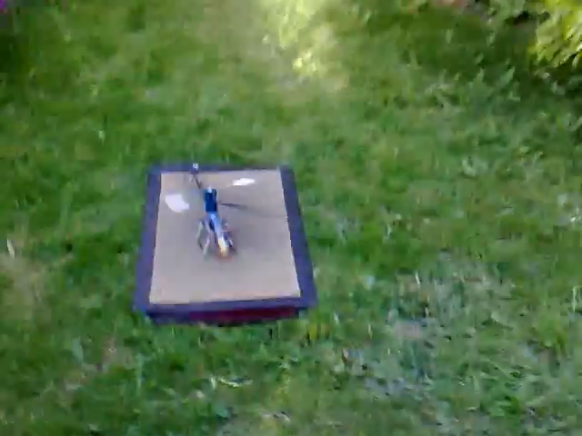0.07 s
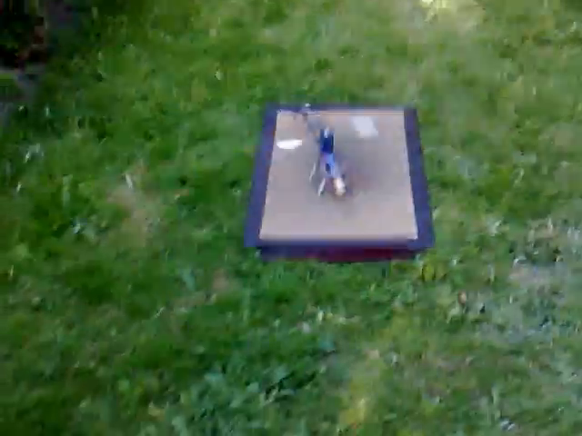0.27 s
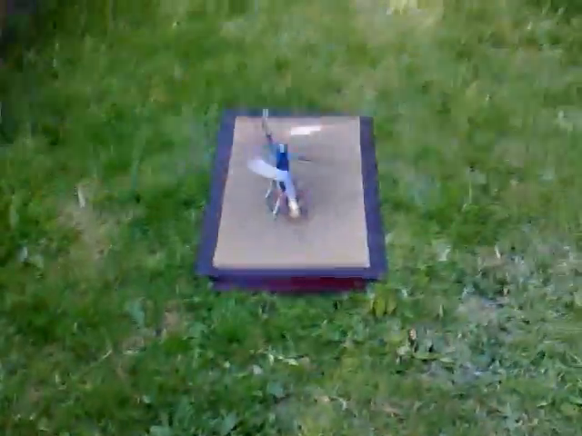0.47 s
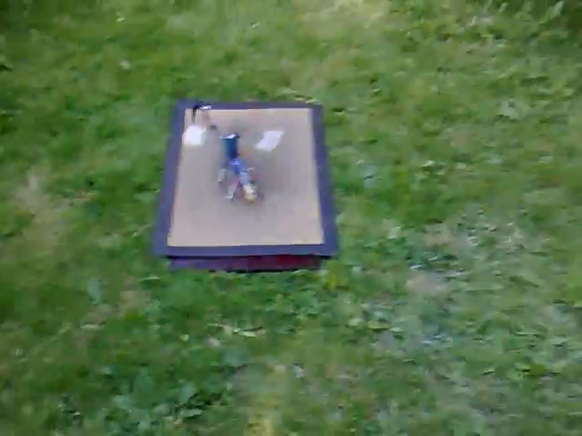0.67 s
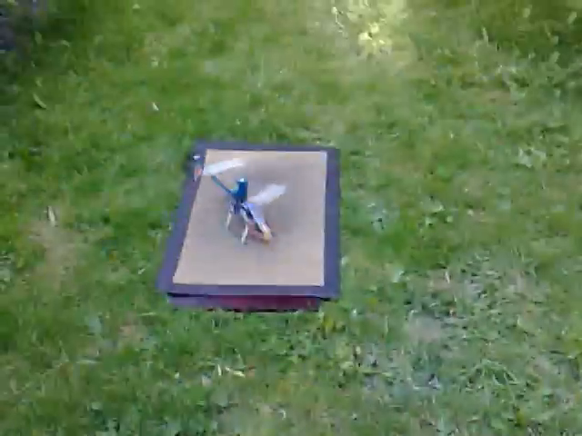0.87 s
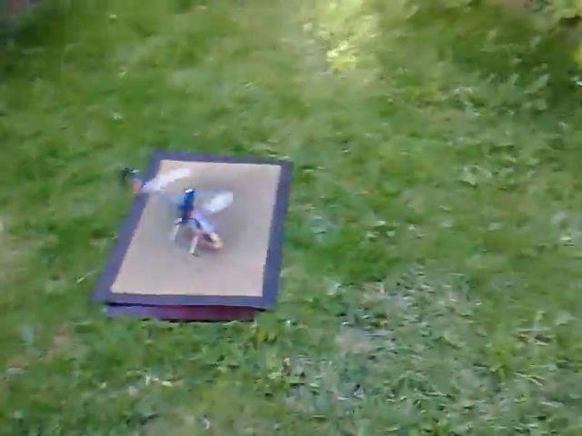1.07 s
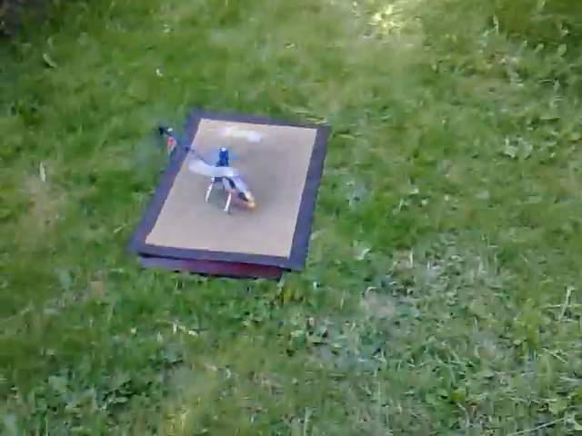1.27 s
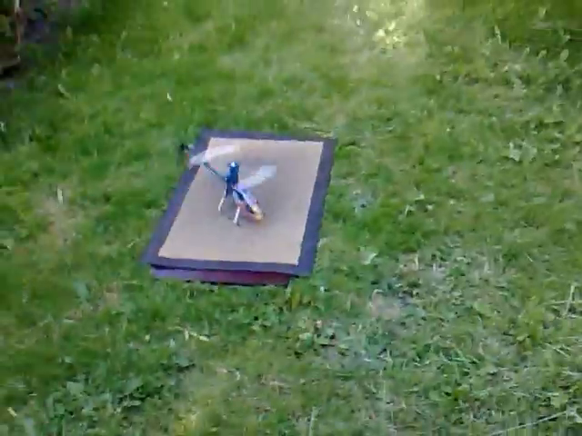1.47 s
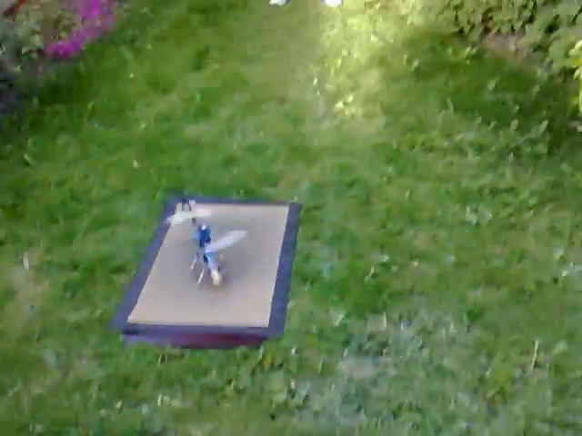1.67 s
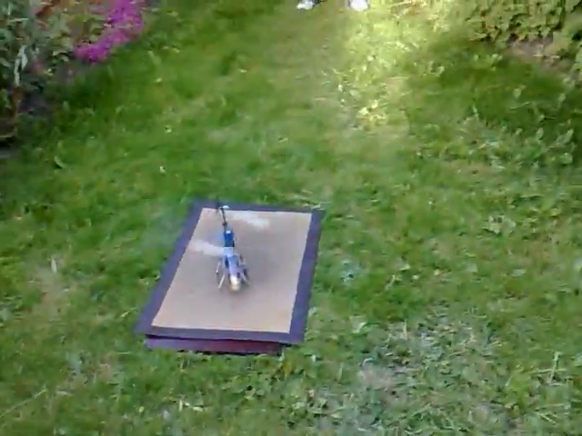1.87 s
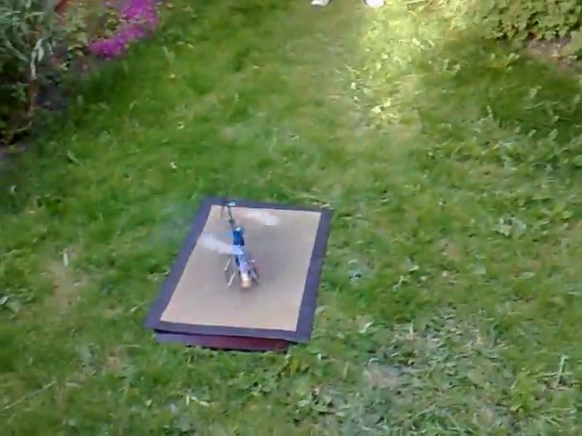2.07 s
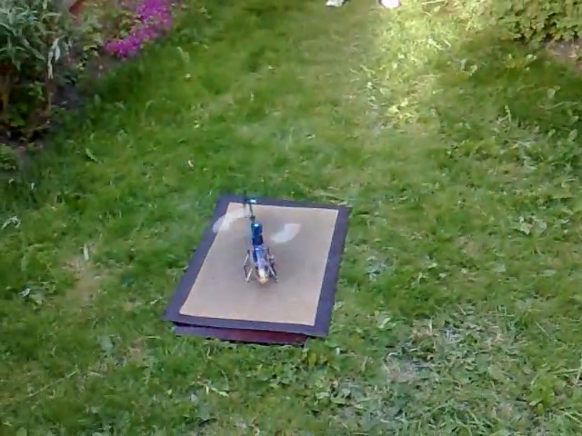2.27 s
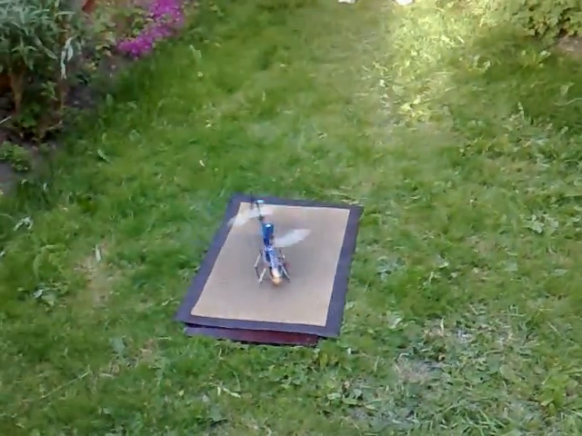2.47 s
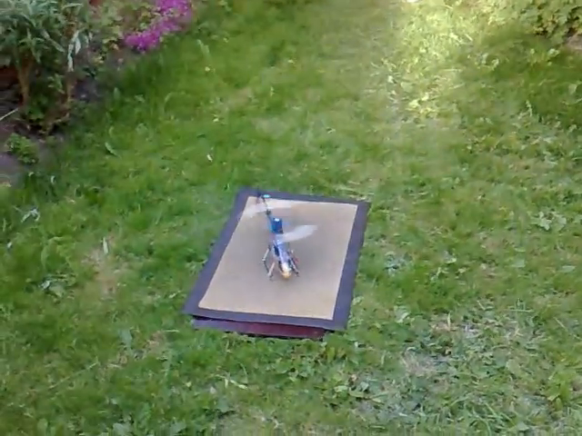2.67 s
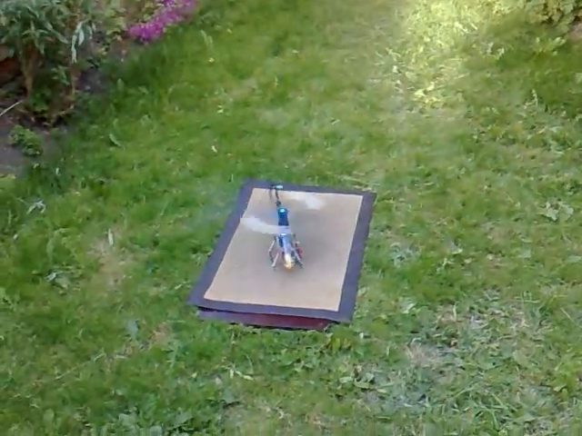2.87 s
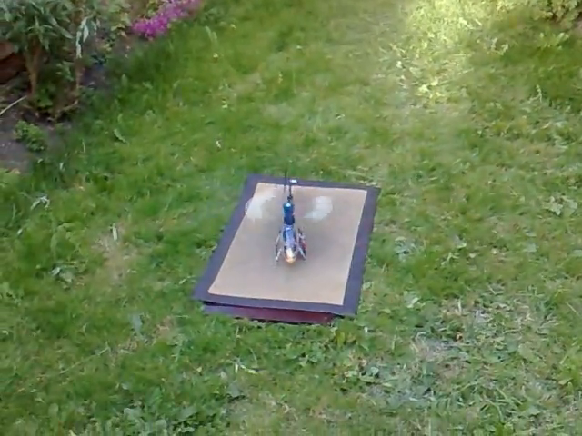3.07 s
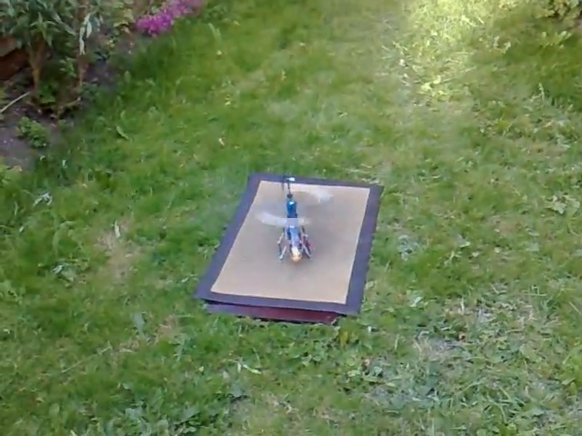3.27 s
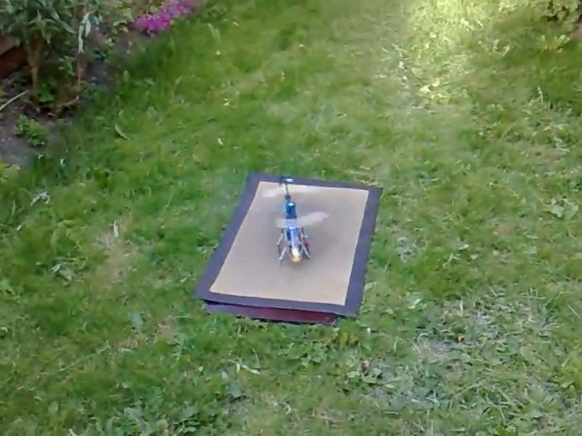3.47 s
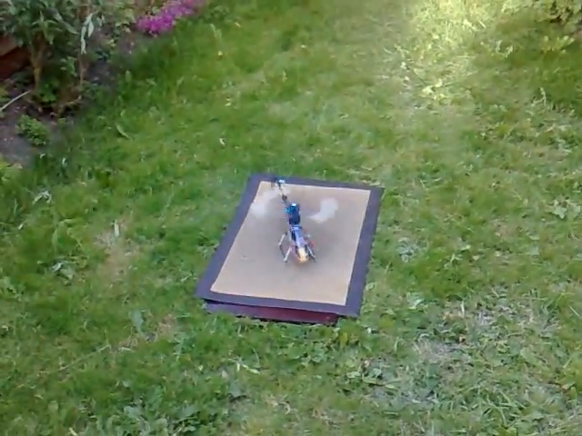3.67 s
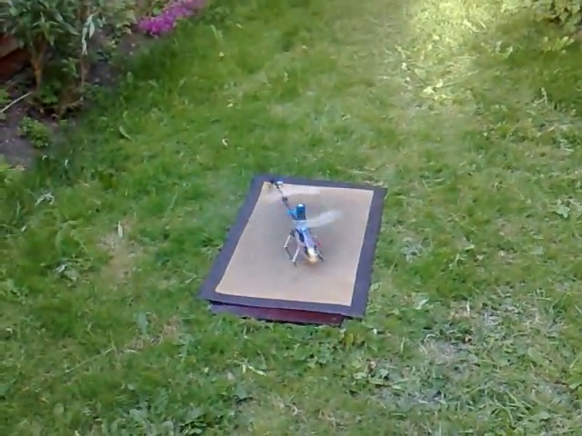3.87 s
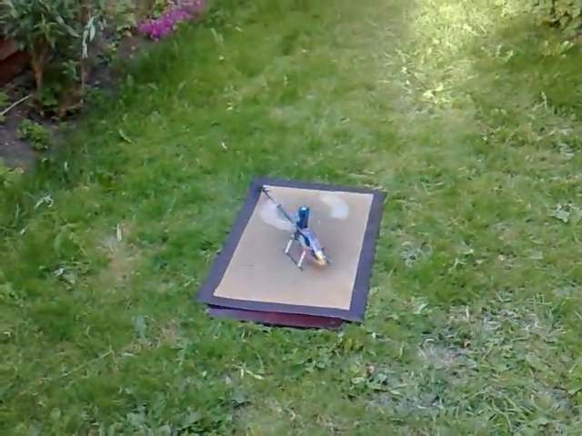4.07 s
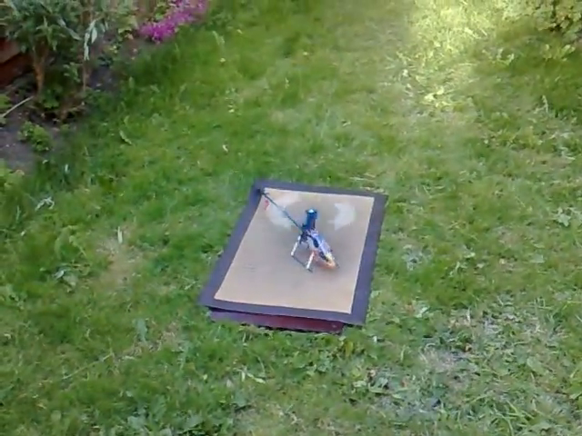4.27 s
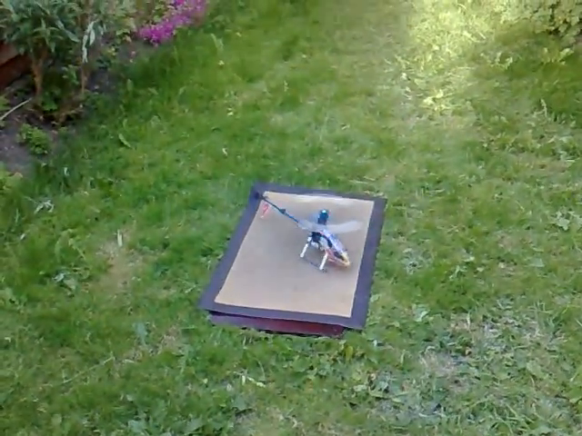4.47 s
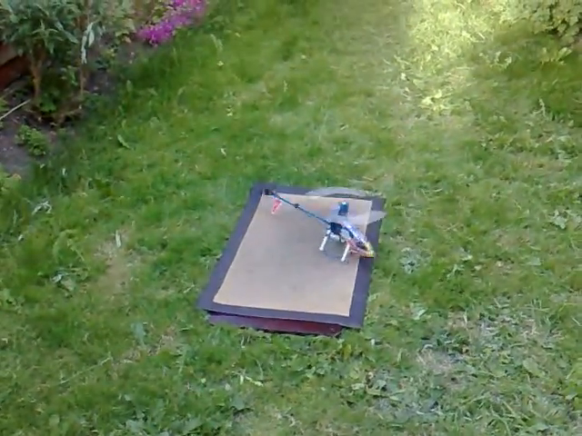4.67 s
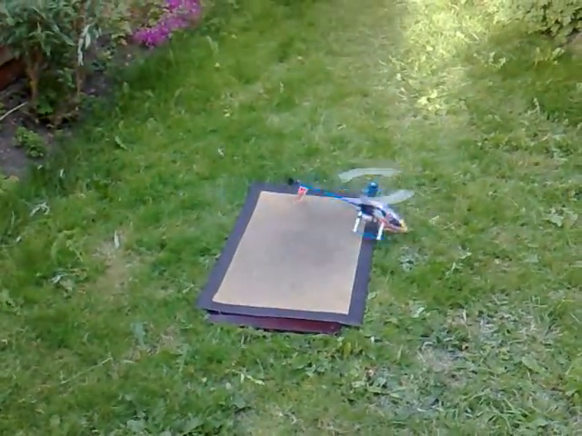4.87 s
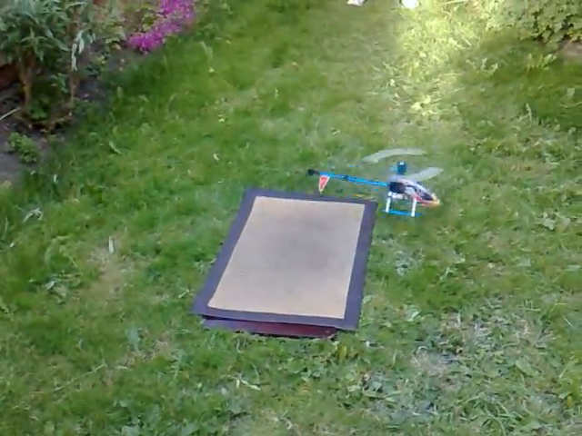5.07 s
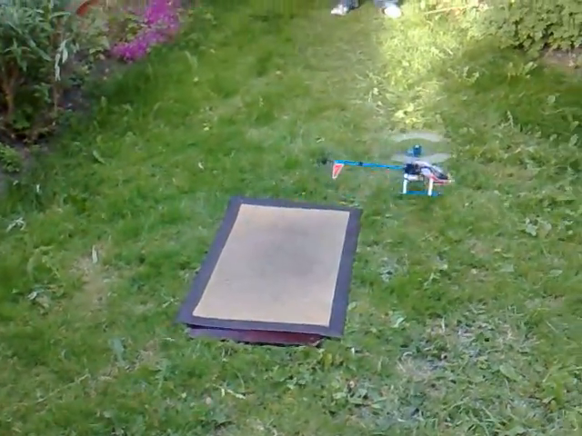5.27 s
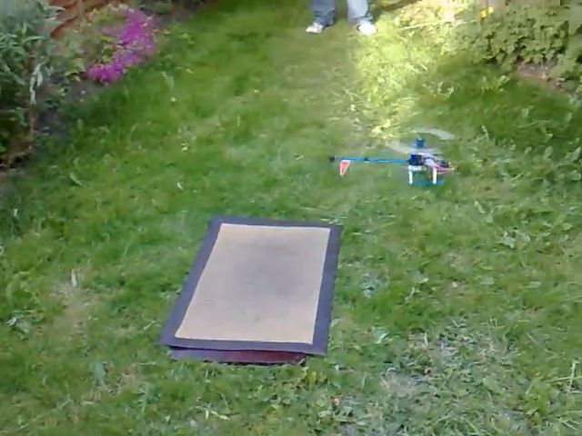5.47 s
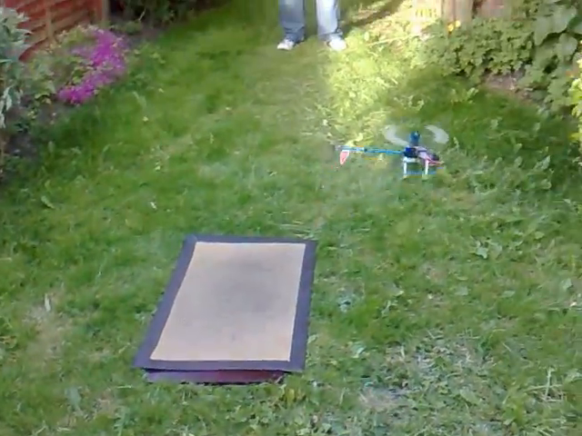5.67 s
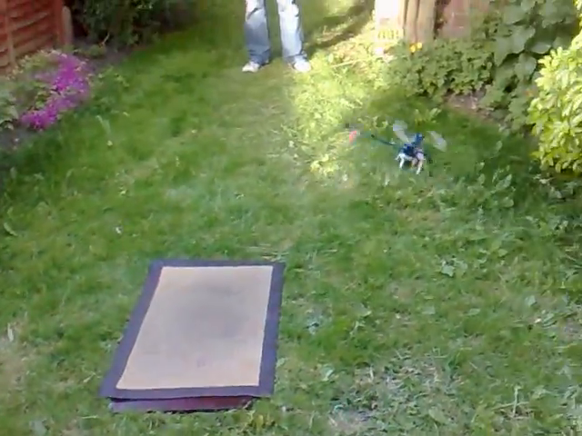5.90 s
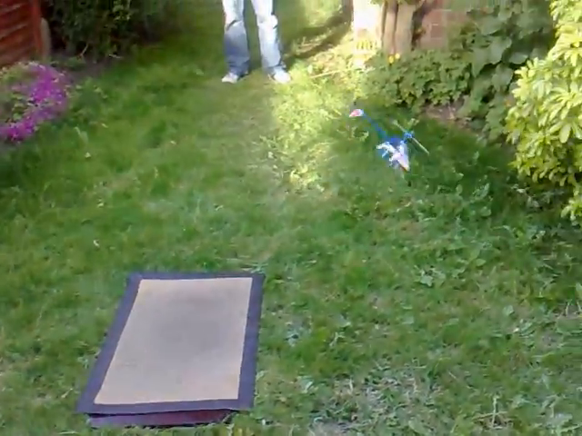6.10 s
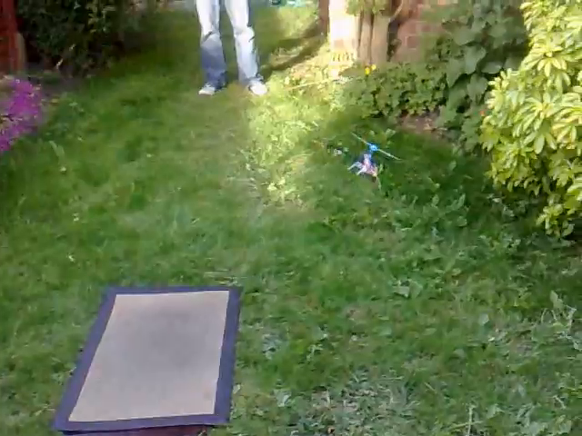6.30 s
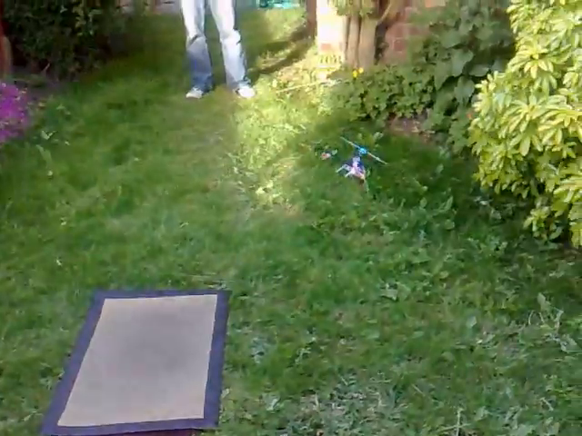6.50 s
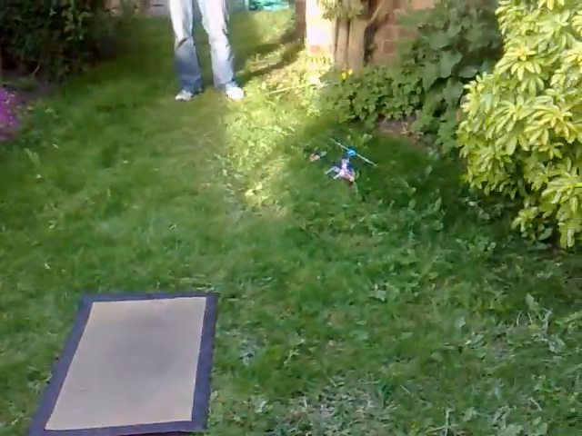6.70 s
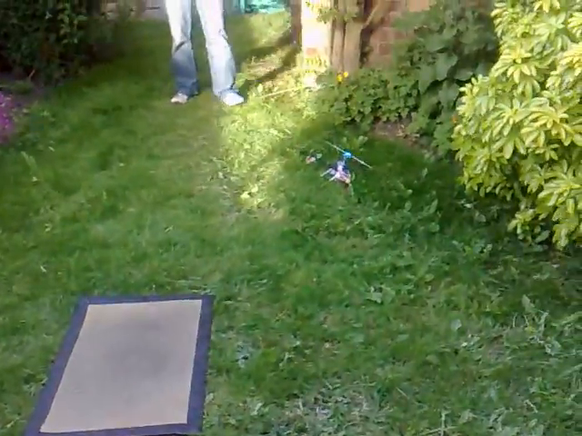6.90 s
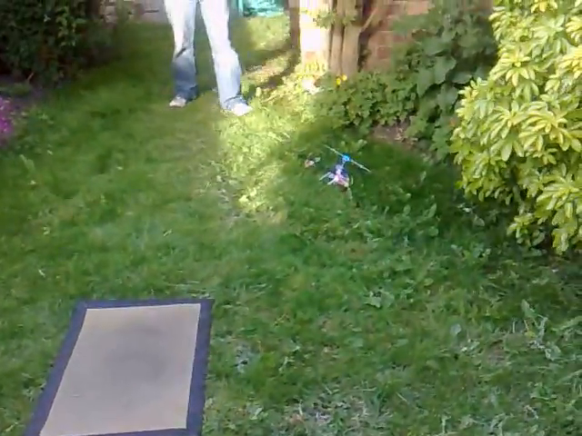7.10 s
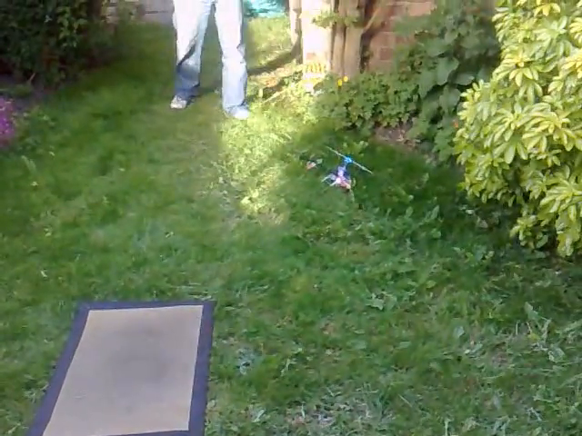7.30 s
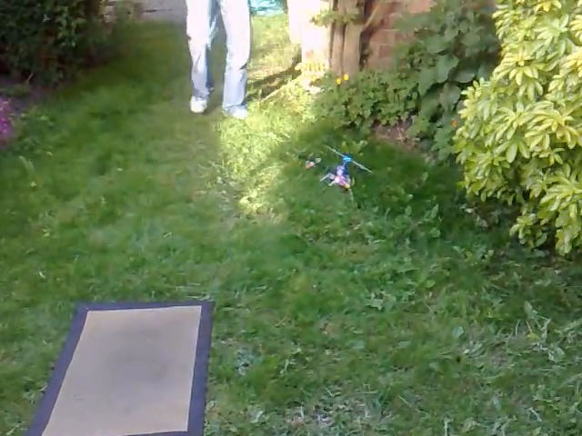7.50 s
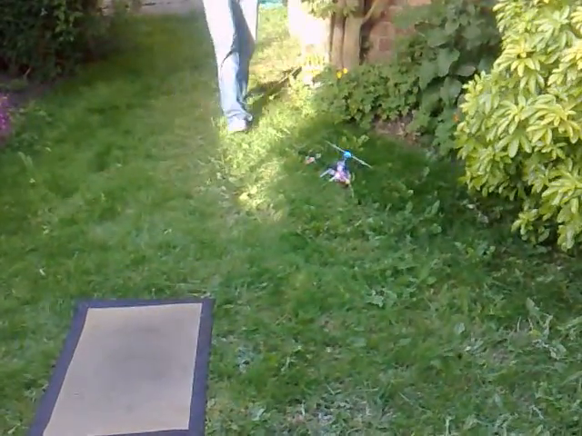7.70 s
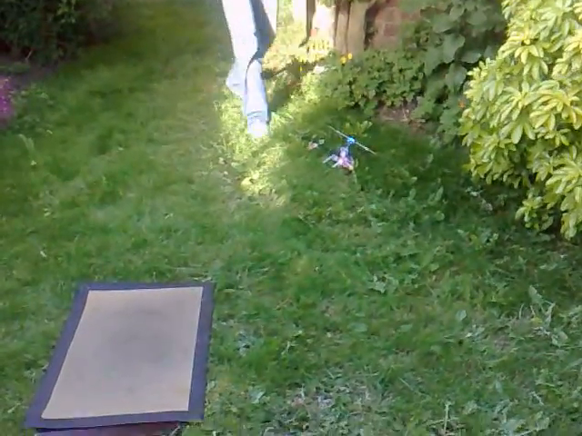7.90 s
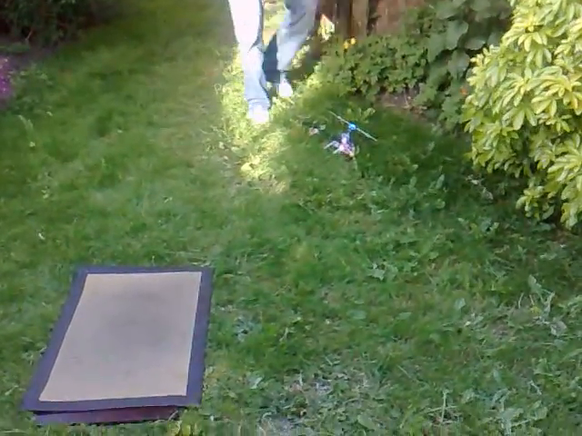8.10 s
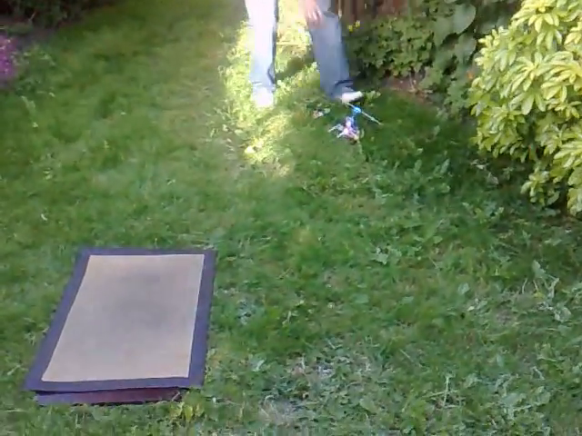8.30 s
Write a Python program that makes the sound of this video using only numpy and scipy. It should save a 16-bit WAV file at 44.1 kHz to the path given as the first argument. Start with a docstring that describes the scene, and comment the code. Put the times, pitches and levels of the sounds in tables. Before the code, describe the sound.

A few clicks, then a toy-sized electric motor accelerates, buzzing and whining through its gears while fast blades hiss brightly. Low wind bumps hit the close, mono microphone, strongest around the second and third seconds. The pitch keeps rising to a steady high whine as it lifts off, then the sound stops suddenly in a loud, dense scrape and snapping of grass, leaving quiet distant rumble and late rustling.

```python
"""In a garden, a small electric helicopter spins up on a board, lifts, and tips into the grass.
The pinion whines on its gear and shaft orders ring the frame: sines locked to the shaft angle.
Rattle, whirr, hiss, grass and garden are shaped noise; snaps are short bursts ringing a resonator.
Wind is random pressure lumps that buffet one microphone."""
import sys
import numpy as np
from scipy import signal
from scipy.io import wavfile
from scipy.ndimage import uniform_filter1d

SR = 44100
rng = np.random.default_rng(int(sys.argv[2]) if len(sys.argv) > 2 else 0)


def invert_db(level):
    """Linear amplitude ratio for a level in decibels (20 dB per decade), elementwise."""
    return 10 ** (np.asarray(level, dtype=float) / 20)


def pcm_store(signal):
    """Save signal as 16-bit PCM."""
    levels = np.round(np.clip(np.atleast_2d(signal), -1, 1) * 32767)
    wavfile.write(sys.argv[1], SR, levels.astype(np.int16).T)


N = 368097

# rotor hiss: (time [s], level [dB], centre [Hz])
HISS_TRACK = [(0, -60, 12000), (.2, -50.5, 12300), (.32, -41, 12200), (.4, -46.5, 12500), (.62, -45, 12900),
              (.8, -41, 12400), (.95, -35, 12200), (1.1, -36, 11800), (1.26, -27.5, 11100),
              (1.42, -31.5, 10900), (1.6, -30.5, 12200), (1.69, -27.5, 12900), (1.87, -35.5, 12300),
              (2.36, -32, 12500), (2.5, -35.5, 12300), (2.71, -29.5, 12870), (3.07, -29, 12600),
              (4.23, -24.5, 14400), (4.6, -26.5, 12200), (5.3, -28.5, 12300), (5.7, -28.5, 13400),
              (6.06, -27.5, 12700)]
# colour of dull rumble: (frequency [Hz], level per Hz [dB])
RUMBLE_COLOUR = [(12, -3), (30, -6), (60, -6), (78, 1.5), (98, -12.5), (200, -20.5)]


def evened(x):
    """Scales to rms 1."""
    return x / np.sqrt(np.mean(x ** 2) + 1e-20)


def curves(rows):
    """Every column of a table at every sample; the ends are held."""
    s, *columns = np.transpose(rows)
    return [np.interp(np.arange(N) / SR, s, c) for c in columns]


def inside(rows, fade_s):
    """1 while a table lasts, fading to 0 outside."""
    t = np.arange(N) / SR
    return np.clip(np.minimum(t - rows[0][0], rows[-1][0] - t) / fade_s + 1, 0, 1)


def slow(per_s):
    """Smooth random wander of rms 1."""
    width = round(SR / per_s)
    return evened(uniform_filter1d(uniform_filter1d(rng.standard_normal(N), width), width))


def noise(colour, patchy_db, size, lift_db=0):
    """Random short-time spectra of a given colour with drifting patches, rms 1."""
    hz, frames = np.fft.rfftfreq(size, 1 / SR), 4 * N // size + 5
    a, b, patches = rng.standard_normal((frames, len(hz), 3)).T
    patches = uniform_filter1d(patches, size // 80, 0)
    patches = evened(uniform_filter1d(patches, 14000 // size, 1))
    f, db = np.transpose(colour)
    colour_db = np.interp(np.log(hz + 1), np.log(f), db, -90, -90)[:, None]
    z = (a + 1j * b) * invert_db(colour_db + patchy_db * patches + lift_db)
    return evened(signal.istft(z, nperseg=size, noverlap=size * 3 // 4)[1][:N])


def add(mix, s, sound):
    """Mixes a sound in at s seconds."""
    part = mix[max(round(s * SR), 0):][:len(sound)]
    part += sound[:len(part)]


def swell(s, hold_s, db, rise_db_per_s, fall_db_per_s):
    """Gain that climbs, holds and falls along straight lines in dB."""
    since = np.arange(N) / SR - s
    down_db = np.maximum(-rise_db_per_s * since, fall_db_per_s * (since - hold_s))
    return invert_db(db - np.maximum(down_db, 0))


def joined(gains):
    """Adds gains as powers."""
    return np.sqrt(sum(np.square(g) for g in gains))


def motor_shaft():
    """Shaft speed in turns per s, and its integral, the shaft angle in radians."""
    # (time [s], shaft speed [turns/s])
    speed = [(0.0, 63.0), (0.2, 111.9), (0.4, 147.8), (0.6, 169.9), (0.7, 176.6), (1.0, 225.7),
             (1.2, 243.5), (1.48, 270.3), (2.0, 285.8), (2.3, 284.2), (2.5, 288.2), (2.87, 318.2),
             (3.07, 313.2), (3.4, 329.9), (3.65, 335.5), (4.1, 354.5), (4.3, 368.6), (4.75, 405.5),
             (4.88, 409.6), (5.05, 405.8), (5.27, 407.4), (5.42, 413.0), (5.92, 415.3), (6.13, 397.0)]
    (shaft_hz,) = curves(speed)
    return shaft_hz, 2 * np.pi * np.cumsum(shaft_hz) / SR


def gear_whine(shaft_hz, turns, throb):
    """Tooth mesh tone and its double, as loud as the airframe radiates each pitch."""
    # radiation of the mesh tone: (pitch [Hz], level [dB])
    mesh = [(700, -70), (1100, -41.5), (1300, -43), (1600, -39), (1770, -46.5), (2150, -46), (2330, -45),
            (2430, -39), (2630, -50), (2730, -40), (2860, -45.5), (3130, -40.5), (3300, -43), (3480, -33),
            (3750, -27), (4070, -30), (4150, -32)]
    # radiation of its double: (pitch [Hz], level [dB])
    double = [(1240, -47), (1800, -43), (2600, -78), (3800, -72), (4250, -47), (4850, -42), (5700, -44.5),
              (6050, -41), (6900, -47), (7400, -62), (8100, -60), (8300, -54)]
    teeth, fade_start_s, fade_db_per_s = 10, 4.85, 3.5
    t = np.arange(N) / SR
    mesh_db = np.interp(teeth * shaft_hz, *np.transpose(mesh))
    mesh_db -= fade_db_per_s * np.maximum(t - fade_start_s, 0)  # the craft drifts away
    double_db = np.interp(2 * teeth * shaft_hz, *np.transpose(double))
    phase = teeth * turns + .55 * slow(per_s=90)
    tones = invert_db(mesh_db + 1.8 * slow(per_s=45)) * (.55 + .45 * throb) * np.cos(phase)
    # tooth errors blur a skirt round the whine
    tones += invert_db(mesh_db - 5.5) * slow(per_s=990) * np.cos(teeth * turns + 1)
    tones += invert_db(double_db) * (.6 + .65 * slow(per_s=250)) * np.cos(2 * teeth * turns)
    return tones


def load_hum(shaft_hz, turns, throb):
    """Fifth and seventh shaft orders, faint once the rotor is under load, with brief swells."""
    # fifth order: (time [s], hold [s], level [dB])
    fifth_swells = [(.85, .12, -47.5), (2.684, 0.14, -38.5), (3.05, 0.1, -44), (4.296, 0.24, -41.5),
                    (5.05, .3, -44.5)]
    # seventh order: (time [s], hold [s], level [dB])
    seventh_swells = [(.79, .16, -39), (1.05, 0.16, -44), (2.55, .25, -44), (3.2, 0.58, -48),
                      (4.5, .25, -47)]
    loaded_turns_per_s, faint_db = 206, -50
    rise_db_per_s, fall_db_per_s = 136, 66
    faint = invert_db(faint_db) * np.clip((shaft_hz - loaded_turns_per_s) / 30, 0, 1)
    fifth, seventh = [joined([faint] + [swell(*row, rise_db_per_s, fall_db_per_s) for row in rows])
                      for rows in (fifth_swells, seventh_swells)]
    phase = 7 * turns + 0.62 * slow(per_s=110)
    hum = seventh * invert_db(1.3 * slow(per_s=47)) * throb * np.cos(phase)
    return hum + fifth * invert_db(0.6 * slow(per_s=75)) * throb * np.cos(5 * turns)


def shaft_orders(shaft_hz, turns, throb, whirr_db):
    """Other multiples of the shaft speed, coloured by the resonances they pass through."""
    # (multiple of the shaft speed [1], level relative to the whirr before growth and resonance [dB])
    orders = [(3, -25), (6, -15), (9, -20.5), (9.42, -30), (11, -16.5), (13, -18.5), (15, -31),
              (29.4, -42.5), (30, -26)]
    # resonances: (frequency [Hz], width [Hz], gain [dB]); the airframe's below 7 kHz, then a bright peak near
    # 12 kHz
    resonances = [(1343, 75, 13), (1640, 82, 13), (1970, 270, -19), (4620, 580, 6), (6600, 510, 18),
                  (12300, 1100, 19)]
    growth_db_per_octave, full_turns_per_s = 7.5, 433
    grown_db = growth_db_per_octave * np.log2(shaft_hz / full_turns_per_s)
    tones = np.zeros(N)
    for order, db in orders:
        hz = order * shaft_hz
        ring_db = sum(lift / (1 + (2 * (hz - f) / w) ** 2) for f, w, lift in resonances)
        level_db = whirr_db + db + grown_db + ring_db + 4.1 * slow(per_s=8)
        phase = order * turns + .04 * order * slow(per_s=110)
        tones += invert_db(level_db) * throb * np.cos(phase)
    return tones


def frame_rattle(knock):
    """Resonant noise of the frame, knocked once a rotor turn."""
    # (time [s], level [dB])
    rattle = [(.4, -42), (.8, -47), (1.2, -50), (1.4, -44), (1.9, -52), (2.3, -51), (2.6, -59), (3.2, -47),
              (3.7, -48), (4.6, -45.5), (5.2, -71)]
    # (frequency [Hz], level per Hz [dB])
    ring = [(1000, -13), (1250, -11), (1340, 9), (1470, -15.5), (1620, 14.5), (1750, -9), (2200, -60.5)]
    (rattle_db,) = curves(rattle)
    gain = invert_db(rattle_db + 2 * slow(per_s=6.3)) * knock
    return gain * noise(ring, 0.55, size=1024) * inside(rattle, 0.026)


def rotor_hiss(turns, hiss_db, bins_hz, centre_hz):
    """Blade noise with a moving spectral peak, pulsed by tail rotor and shaft."""
    # (frequency [Hz], level per Hz [dB])
    hiss_colour = [(5000, -32), (8000, -41), (10000, -14.5), (12000, -2), (14500, -0.5), (16000, -16)]
    tail_ratio = 7 / 12
    peak_db = 6 / (1 + ((bins_hz - centre_hz) / 700) ** 2)
    pulse = 1 + 0.16 * np.cos(tail_ratio * turns) + 0.075 * np.cos(2 * tail_ratio * turns)
    pulse += 0.066 * np.cos(turns)
    gain = invert_db(hiss_db + 0.95 * slow(per_s=300) + 0.86 * slow(per_s=14))
    return gain * pulse * noise(hiss_colour, 1.14, size=256, lift_db=peak_db)


def whirr(whirr_db, bins_hz, frame_shaft_hz):
    """Broad noise of gears and blades, thinning as the craft flies off."""
    # (frequency [Hz], level per Hz [dB])
    whirr_colour = [(250, -13.5), (600, -16.5), (1000, -7), (1900, -6), (3000, -7.5), (4500, -8.5),
                    (6000, -11.5), (8000, -17.5), (11000, -12)]
    lift_off_s, away_db_per_s = 5.27, 1.86
    # slow blades make less treble
    dull_db = -11 * np.clip(1 - frame_shaft_hz / 260, 0, 1) / (1 + (2300 / (bins_hz + 1)) ** 6)
    away_db = away_db_per_s * np.maximum(np.arange(N) / SR - lift_off_s, 0)
    gain = invert_db(whirr_db - away_db + 0.27 * slow(per_s=90))
    return gain * noise(whirr_colour, 2.3, size=256, lift_db=dull_db)


def helicopter():
    """Tones on the shaft speed, throbbing once a rotor turn, over rattle, whirr and hiss."""
    rotor_ratio, stall_s, stall_fade_s = 1 / 14, 6.03, .085
    shaft_hz, turns = motor_shaft()
    hiss_db, hiss_hz = curves(HISS_TRACK)
    # the whirr follows the hiss by a share of its dB: -33.5 dB when the hiss is at -29 dB
    whirr_db = -33.5 + 0.42 * (hiss_db + 29)
    # a tight spot on the big gear passes once a turn
    knock = evened((1 + np.cos(rotor_ratio * turns)) ** 1.6)
    # backlash closes up at speed
    slack = np.interp(shaft_hz, [275, 300], [.65, .45])
    throb = 1 + slack * (knock - 1)
    tones = gear_whine(shaft_hz, turns, throb) + load_hum(shaft_hz, turns, throb)
    tones += shaft_orders(shaft_hz, turns, throb, whirr_db)
    # the tones die as the blades catch
    running = np.clip(1 - (np.arange(N) / SR - stall_s) / stall_fade_s, 0, 1)
    bins_hz = np.fft.rfftfreq(256, 1 / SR)[:, None]
    at = np.minimum(np.arange(N // 64 + 5) * 64, N - 1)  # sample at each spectral frame
    air = whirr(whirr_db, bins_hz, shaft_hz[at]) + rotor_hiss(turns, hiss_db, bins_hz, hiss_hz[at])
    return np.sqrt(2) * tones * running + frame_rattle(knock) + air * inside(HISS_TRACK, 0.04587)


def puff(hz):
    """A pressure lump of about one and a half cycles."""
    u = np.arange(-1.5, 1.5, hz / SR)
    return np.cos(2 * np.pi * u + .5) * np.exp(-(u / .5) ** 2)


def wind():
    """Eddies of several sizes burst on the microphone; gusts rise faster than they fall."""
    # (time [s], hold [s], big-eddy level [dB], small eddies relative to big [dB])
    gust_rows = [(0.044, .06, -38.5, -16), (0.207, 0.17, -30.5, -14.5), (0.439, .09, -22, -30),
                 (0.812, 0.048, -28, -21), (0.972, 0.19, -29.5, -17), (1.204, .16, -24.5, -16),
                 (1.41, 0.12, -27, -9), (1.526, 0.17, -29.5, -7.5), (1.773, 0.077, -23.5, -9),
                 (1.877, 0.16, -31.5, -16), (2.14, 0.1, -20.5, -11.5), (2.292, 0.068, -15.5, -11),
                 (2.414, 0.2, -26, -12.5), (2.729, 0.028, -25.5, -4), (2.823, 0.22, -30, -10),
                 (3.0, 0.166, -28, -18), (3.196, .26, -37.5, -26), (4.041, 0.047, -35, -15.5),
                 (4.253, 0.075, -36, -12.5), (4.368, .38, -44.5, -7.5), (4.504, 0.044, -34, -6.5),
                 (4.82, 0.16, -25, -5), (5.0, .09, -33.5, -16)]
    # hardest puffs: (centre time [s], level [dB], frequency [Hz])
    puffs = [(1.49, -10.5, 82), (1.621, -12.5, 180), (1.66, -13.5, 270), (1.781, -13.5, 127),
             (2.214, -9.5, 158), (2.352, -6.5, 191), (2.596, -14.5, 201), (2.764, -8.5, 175)]
    rise_db_per_s, fall_db_per_s = 500, 212
    breeze_db, breeze_small_db, calm_s = -45.5, -57.5, 5.1
    big, small = np.zeros(N), np.zeros(N)
    for eddies, sizes_hz, per_s in ((big, (43.7, 58.4, 78.5, 103, 137.5), 30),
                                    (small, (157.6, 193, 224, 300, 400), 40)):
        for hz in sizes_hz:
            train = rng.standard_normal(N) * (rng.random(N) < per_s / SR)
            add(eddies, 0, signal.oaconvolve(train, puff(hz), "same") * (hz / sizes_hz[0]) ** -.3)
    breeze = np.clip((calm_s - np.arange(N) / SR) / 0.15 + 1, 0, 1)
    gusts = [(swell(*row, rise_db_per_s, fall_db_per_s), invert_db(small_db)) for *row, small_db in gust_rows]
    out = joined([invert_db(breeze_db) * breeze] + [g for g, _ in gusts]) * evened(big)
    out += joined([invert_db(breeze_small_db) * breeze] + [g * share for g, share in gusts]) * evened(small)
    for s, db, hz in puffs:
        add(out, s - 1.5 / hz, -invert_db(db) * puff(hz))
    return out


def garden():
    """Far traffic rumble, yard noise, a rustle that grows late, and a brief wavering low hum."""
    # (time [s], rumble level [dB], yard level [dB], rustle level [dB])
    levels = [(3.4, -59, -46, -64), (5.3, -50.5, -59.5, -70), (6.1, -56, -44, -66),
              (6.5, -47.5, -54.5, -72), (6.8, -49, -55.5, -71), (7.0, -57, -54.5, -73),
              (7.12, -50, -51.5, -73), (7.3, -55.5, -53.5, -70.5), (7.8, -58.5, -52, -59.5),
              (8.35, -49, -52, -62)]
    # (time [s], frequency [Hz], level [dB])
    hum_track = [(5.12, 128.3, -54), (5.226, 143, -50), (5.76, 129, -53)]
    # (frequency [Hz], level per Hz [dB])
    yard_colour = [(60, -32), (110, -10.5), (250, -1), (450, -9.5), (800, -6), (1400, -8), (2100, -8.5),
                   (3000, -16), (6000, -27), (15800, -36)]
    # (frequency [Hz], level per Hz [dB])
    rustle_colour = [(1500, -6.5), (3000, -6), (5000, 7), (8000, 6.5), (11500, 14.5), (14000, 13),
                     (16000, 7)]
    rumble_db, yard_db, rustle_db = curves(levels)
    hum_hz, hum_db = curves(hum_track)
    hum = np.sqrt(2) * invert_db(hum_db) * np.cos(2 * np.pi * np.cumsum(hum_hz) / SR) * inside(hum_track, .03)
    yard = invert_db(yard_db) * noise(yard_colour, 1., size=1024)
    rustle = invert_db(rustle_db + .8 * slow(per_s=40)) * noise(rustle_colour, 1.2, size=512)
    return invert_db(rumble_db) * noise(RUMBLE_COLOUR, 1.07, size=2048) + yard + rustle + hum


def snaps():
    """Millisecond bursts of wide noise with a bright ring and a short tail."""
    # (time [s], peak level [dB], ring frequency [Hz])
    snap_rows = [(0.0323, -15, 4640), (0.125, -19.5, 12100), (0.154, -16, 5550), (0.249, -24, 12900),
                 (1.1192, -7.5, 3470), (6.0776, -12, 2200), (6.095, -15, 14600), (6.102, -11, 9500),
                 (6.111, -7.5, 4470), (6.134, -14, 13000), (6.1767, -18, 11400), (6.1898, -15.5, 2200),
                 (6.2004, -9.5, 11800)]
    out, t = np.zeros(N), np.arange(900) / SR
    burst = signal.lfilter([1, 0, -.5], [1], rng.standard_normal((len(snap_rows), len(t))))
    shape = (np.exp(-t / .0007) + .08 * np.exp(-t / .005)) * np.minimum(t / .0004, 1)
    for (s, db, hz), crack in zip(snap_rows, burst):
        ring = signal.lfilter(*signal.iirpeak(hz, 2.5, SR), crack)
        snap = (0.21 * crack + ring) * shape
        add(out, s, invert_db(db) * snap / abs(snap).max())
    return out


def downwash():
    """Dull rush of air while the craft skims the lawn."""
    # (time [s], level [dB])
    wash_track = [(4.6, -50), (5.3, -45.5), (6.1, -39.5), (6.2, -39), (6.29, -41.5), (6.34, -56)]
    # (frequency [Hz], level per Hz [dB])
    wash_colour = [(90, -25), (150, -6), (280, 0.5), (500, -6), (900, -1.5), (1350, -22), (2100, -9),
                   (4000, -19.5)]
    (wash_db,) = curves(wash_track)
    return invert_db(wash_db) * inside(wash_track, .1) * noise(wash_colour, 2.3, size=1024)


def crash():
    """A dense crackling roar: bright swish of cut grass over the duller scrape of the body, and a thud."""
    # the body drags, then one small bounce: (time [s], hold [s], level [dB])
    scrapes = [(6.08, 0.16, -29.5), (6.387, 0.041, -47)]
    # blades cut grass: (time [s], level [dB], time to 10 dB down, sign ignored [s])
    swishes = [(6.137, -16, 0.07), (6.375, -48.5, -0.06)]
    # (time [s], hold [s], level [dB])
    thud = (6.17, 0.0206, -38.5)
    # scrape colour: (frequency [Hz], level per Hz [dB])
    grass_colour = [(150, -34), (300, -4.5), (450, -10), (1000, 3.5), (2000, 4.5), (3600, 2.5),
                    (6000, -9.5), (9000, -28)]
    # swish colour: (frequency [Hz], level per Hz [dB])
    swish_colour = [(4000, -20), (7000, -14.5), (10000, -8), (12900, -1.5), (15000, -6), (16000, -25)]
    rise_db_per_s, fall_db_per_s = 400, 225
    t = np.arange(N) / SR
    scrape = joined(swell(*row, rise_db_per_s, fall_db_per_s) for row in scrapes)
    swish = joined(invert_db(db - 10 * abs((t - s) / half) ** 1.38) for s, db, half in swishes)
    swish = swish * np.clip((t - HISS_TRACK[-1][0]) / .03 + 1, 0, 1)
    # about 900 hits per s, each decaying in 0.78 ms
    hits = invert_db(3 * np.minimum(rng.exponential(1, N), 3)) * (rng.random(N) < 900 / SR)
    crackle = evened(1 + .5 * signal.lfilter([1], [1, -np.exp(-1 / (0.00078 * SR))], hits))
    grass = scrape * crackle * noise(grass_colour, 2.2, size=256)
    grass += swish * crackle * noise(swish_colour, 2.2, size=256)
    return grass + swell(*thud, rise_db_per_s, fall_db_per_s) * noise(RUMBLE_COLOUR, 1.1, size=2048)


def scene():
    """All sources reach one microphone, heard alike on two channels."""
    mono = helicopter() + wind() + garden() + snaps() + downwash() + crash()
    return np.array([mono, mono])


def band_limit(x):
    """A steep low-pass at the top of the band."""
    return signal.sosfilt(signal.butter(12, 16490, fs=SR, output="sos"), x)


def record(dry):
    """The microphone drops the deepest bass; a steep low-pass limits the band."""
    edge_hz = 15730
    low_cut = signal.sosfilt(signal.butter(1, 45, "high", fs=SR, output="sos"), dry)
    edge = signal.firwin(511, edge_hz, window=("kaiser", 9), fs=SR)
    mix = signal.oaconvolve(low_cut, edge[None], "same")
    return band_limit(mix)


dry = scene()
out = record(dry)
pcm_store(out)
```